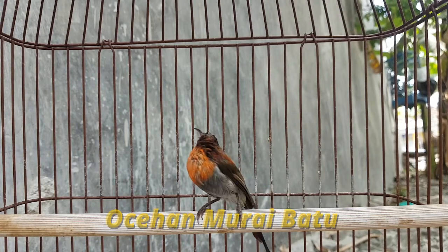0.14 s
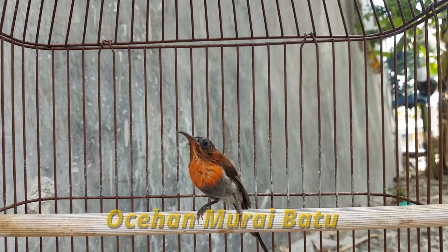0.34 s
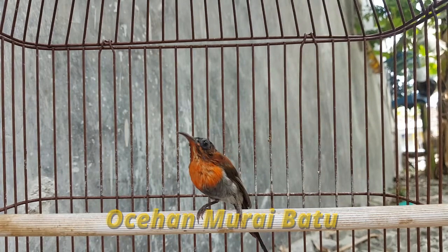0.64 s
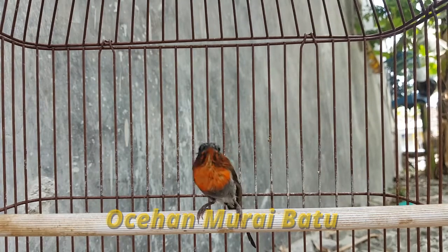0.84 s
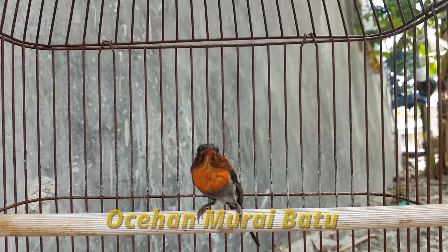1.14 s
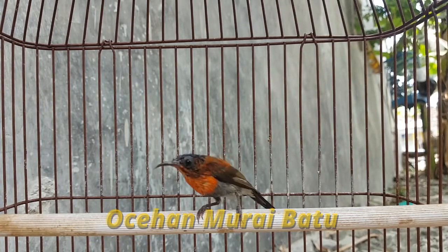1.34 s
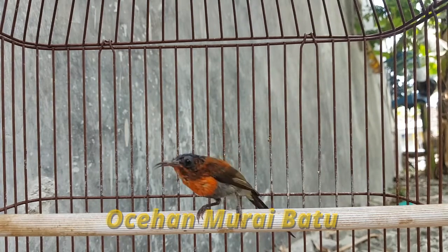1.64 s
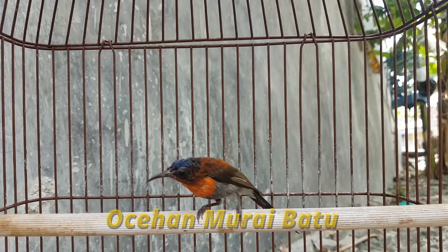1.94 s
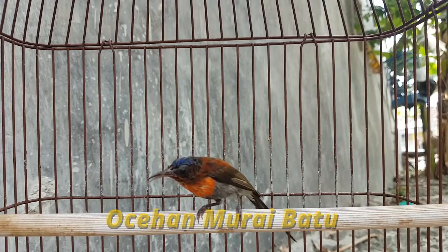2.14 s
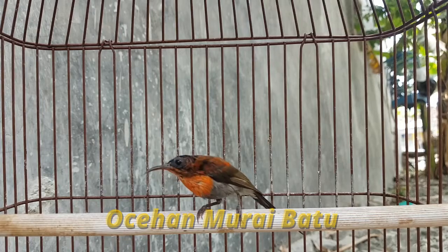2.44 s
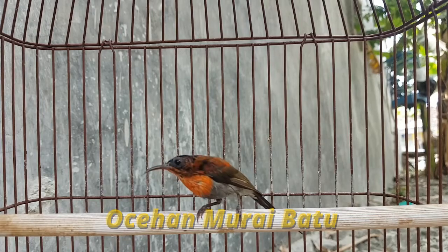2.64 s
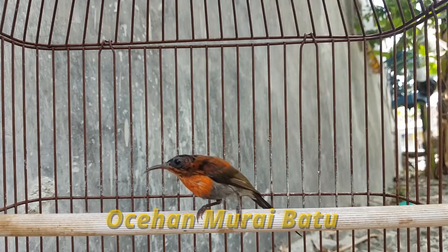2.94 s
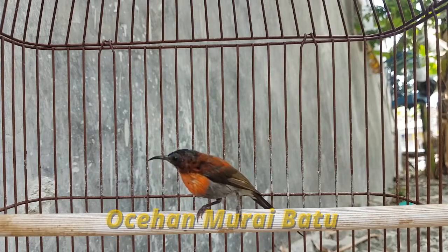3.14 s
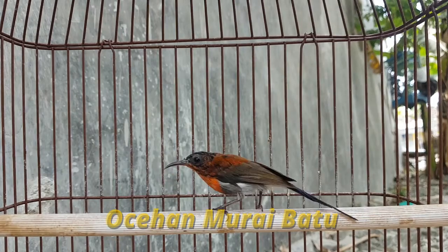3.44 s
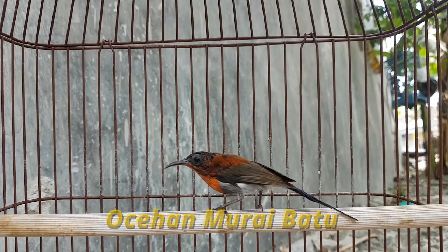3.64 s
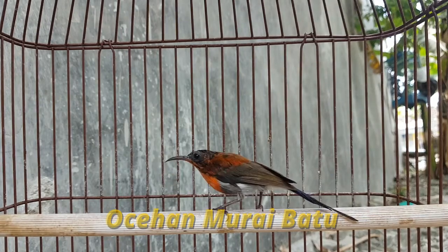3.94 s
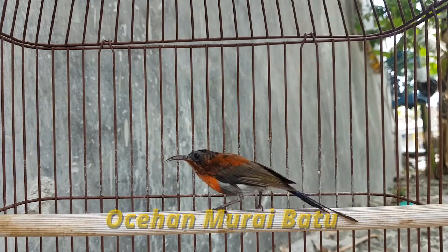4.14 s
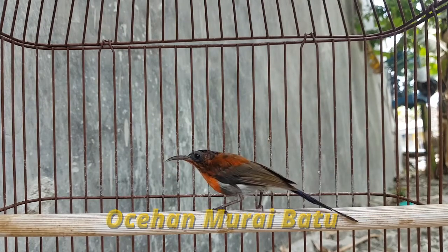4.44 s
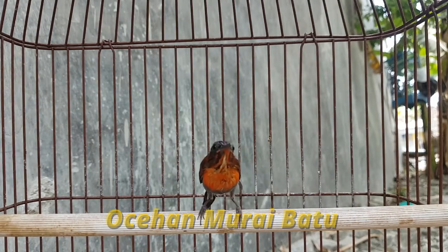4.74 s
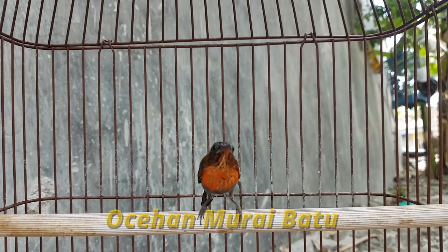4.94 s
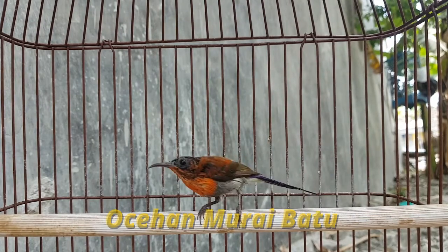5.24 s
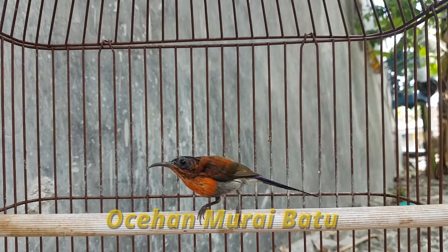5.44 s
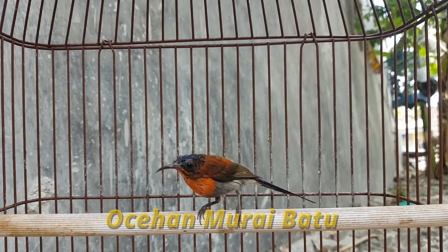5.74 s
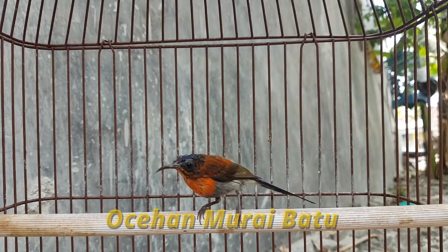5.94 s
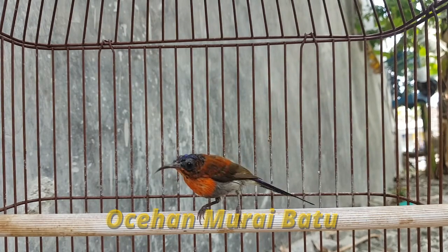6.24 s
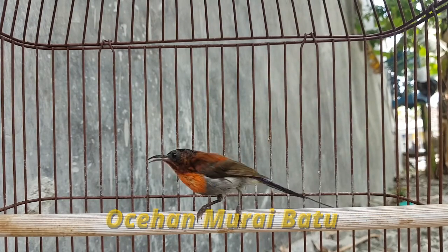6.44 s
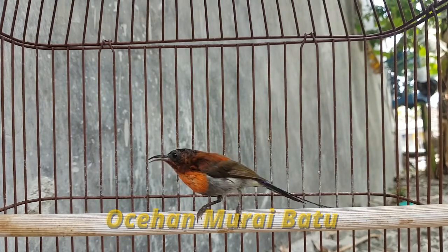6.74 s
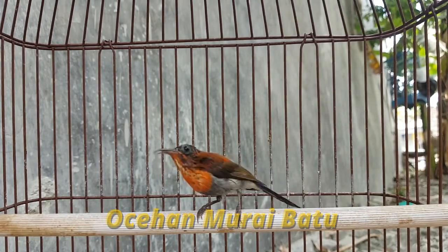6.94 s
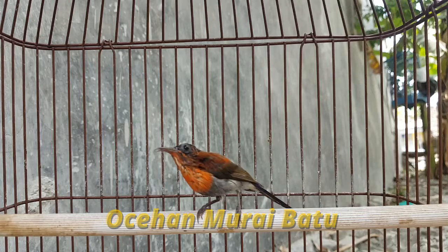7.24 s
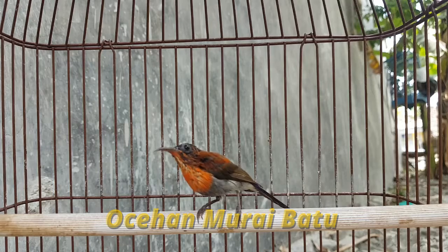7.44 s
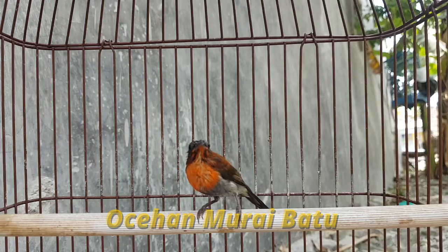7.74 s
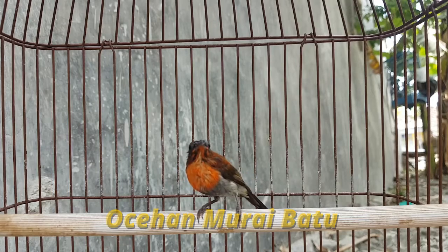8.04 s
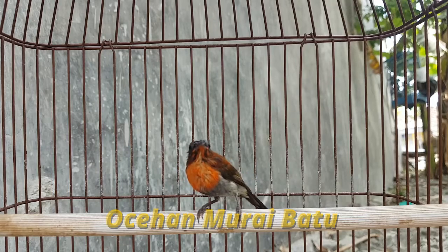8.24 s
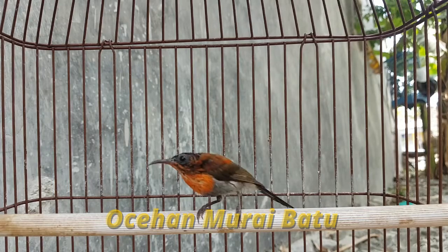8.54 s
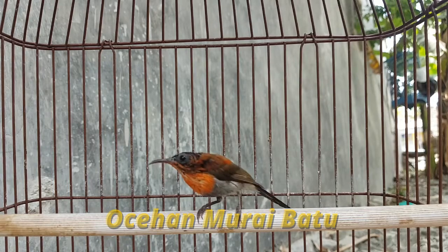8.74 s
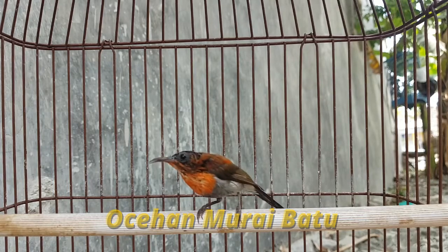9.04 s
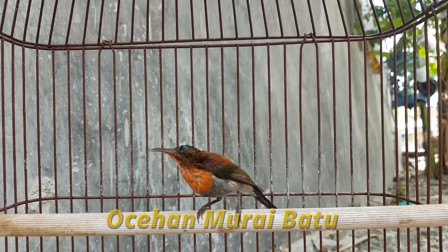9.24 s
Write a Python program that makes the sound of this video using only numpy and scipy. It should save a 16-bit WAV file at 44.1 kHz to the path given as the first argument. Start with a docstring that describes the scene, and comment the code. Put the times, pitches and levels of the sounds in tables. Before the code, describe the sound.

Close, piercing warbles, chips and short whistles from a small caged bird repeat between pauses, over far-off bird calls and soft street noise.

```python
"""A small caged bird sings close to a two-port microphone under a roof: warble, chip, long whistle,
over and over. The two halves of its syrinx modulate each other; its throat adds a rasp.
The walls echo the song, and the loudest notes are limited and clip. Other birds whistle, chip
and call hoarsely far away. Outside: traffic, a passing engine, a thin rustle and faint hums,
all dipping briefly a third of the way in."""
import sys
import numpy as np
from scipy import signal
from scipy.fft import rfft, irfft, next_fast_len
from scipy.io import wavfile
from scipy.ndimage import uniform_filter1d, minimum_filter1d, map_coordinates

SR = 44100
rng = np.random.default_rng(int(sys.argv[2]) if len(sys.argv) > 2 else 0)


def output_pcm(signal):
    """Save a mono or channel-first signal as 16-bit PCM at the path in sys.argv[1].

    Samples are clipped to [-1, 1] before scaling.
    """
    pcm = np.clip(np.atleast_2d(signal).T, -1, 1) * 32767
    wavfile.write(sys.argv[1], SR, np.round(pcm).astype(np.int16))


N = 413216
TIME_S = np.arange(N) / SR
PORT_LAG_S, TOP_HZ = 0.00014, 17560

# Each row: time in seconds, then rumble, street and engine levels in relative dB.
TRAFFIC_LEVELS = [(0, -80.5, -68, -96), (.75, -60.5, -62, -90), (1.3, -72.5, -66.5, -93),
                  (2.5, -71.5, -63, -89), (3.7, -71, -70.5, -86.5), (4.28, -58.5, -61, -59.5),
                  (5.1, -75.5, -72.5, -91.5), (5.8, -68.5, -66.5, -77.5), (6.35, -56, -59, -69),
                  (7.1, -76, -64.5, -95.5), (8, -72, -67, -88), (9.37, -71, -59, -84)]
# Each row: time in seconds, gain in dB.
OUTDOOR_FADE = [(0, 0), (2.6, -2), (3.05, -12), (3.28, -27), (3.312, -36), (3.32, -11), (3.6, 2.5), (4, -3),
                (9.4, -1.5)]
RUSTLE_GAIN = [(0, -67), (.1, -68), (.16, -90), (.64, -92), (.655, -56), (.75, -89), (1.3, -78), (1.5, -95)]
# Spectra. Each row: frequency in Hz, level in relative dB.
RUMBLE_SPECTRUM = [(12, -48.5), (20, -22), (38, -5.5), (75, -4.5), (112, -8), (189, -13.5), (700, -16.5),
                   (910, -51.5), (1540, -120)]
STREET_SPECTRUM = [(180, -43.5), (300, -20.5), (348, -3.5), (385, -10.5), (1030, 0), (1720, 1), (2480, -10),
                   (2740, -13.5), (5610, -35), (10900, -31), (16000, -41)]
RASP_SPECTRUM = [(900, -62.5), (1600, -33), (2600, -18), (4200, -10), (5800, -5), (7600, -15), (11000, -19),
                 (15500, -28.5), (16300, -62.5)]
OVERTONE_SPECTRUM = [(6000, -36), (8500, -36.5), (11000, -29), (13500, -37.5), (16000, -47.5),
                     (17000, -60.5)]
WALL_RESPONSE = [(2500, 10), (3500, 1.5), (4400, 3), (5400, 5), (7000, 0.5), (9000, 6), (14000, -8)]
INPUT_RESPONSE = [(9000, 0.5), (12000, -1.5), (16000, -11)]
# Outdoor noise. Each row: frequency in Hz, left-right correlation.
COHERENCE = [(60, 0.93), (180, 1), (550, -0.13), (1650, 0.19), (4970, 1), (15000, -0.01)]
# Each row: multiple of the firing rate, level in relative dB.
ENGINE_ORDERS = [(3, -7.5), (4, -9.5), (5, 2.5), (6, -3.5), (7, -16.5)]
# Each row: start in seconds, level in relative dB, nominal low and high pitch in Hz, high re low in dB.
FAR_CHIPS = [(0.1474, -70.5, 2150, 4340, 18.5), (0.6539, -28.5, 2385, 4000, -55),
             (1.2213, -44, 2761, 4260, -23), (2.6086, -53, 2940, 4080, -40), (3.024, -63, 2797, 5090, -34),
             (3.3702, -46, 2575, 5890, -4), (5.908, -51, 2940, 5150, -12), (6.7233, -34, 2768, 4582, 5),
             (7.57, -43, 2300, 4470, -25), (7.8344, -43.5, 2245, 5815, -15),
             (7.9981, -45.5, 2070, 4705, -4.5), (8.5799, -39, 3454, 4200, -19.5),
             (9.1549, -36, 2371, 5055, 4.5)]
# Glides. Each row: start and length in seconds, first, middle and last pitch in Hz,
# peak in relative dB, peak position 0-1, rise and fall in dB.
FAR_WHISTLES = [(.29, .62, 3624, 3650, 2676, -57, 0.76, 10.5, 7.5),
                (2.05, 0.44, 3660, 3780, 3754, -46.5, 0.28, -0.5, 31),
                (5.07, .67, 3835, 3620, 2899, -61, 0.32, 17.5, 12),
                (6.79, .18, 3760, 3780, 3836, -45.5, .5, -1.5, 8),
                (6.99, 0.2, 3809, 3780, 3720, -43.5, 0.01, -3, 34.5),
                (8.47, 0.1, 3330, 3350, 3370, -65.5, 0.9, 12.5, 3),
                (8.4, 0.3, 4964, 4050, 3990, -52.5, 0.62, 24, 22)]
FAR_HOARSE_CALLS = [(.46, .14, 2000, 2120, 2025, -37, .25, 13, 30),
                    (.6, 0.2, 2065, 2089, 2000, -49, .55, 24, 33),
                    (6.28, 0.23, 1305, 1305, 1278, -52.5, .45, 7, 5.9),
                    (7.4, .16, 3350, 3207, 3040, -50, .2, 5, 16)]
HUM_GLIDES = [(3.58, .2, 511.4, 534.5, 534, -71, .45, 17, 14),
              (7.68, 1.8, 1181, 1151, 1122, -68, 0.98, 7.9, 1)]
# The song. Each row: start and length in seconds, gain in dB, detune in percent, then in dB:
# 2nd harmonic offset, rasp offset, growth over the note, left-right balance from the head's turn.
SONG_WARBLES = [(1.596, .182, .5, .3, 3, 1.5, -2, -2), (4.09, .177, .5, -0.24, -1, -0.5, 1, -2.5),
                (6.392, .18, 0.5, 0.23, -.5, -0.5, 1.5, -1), (7.214, .186, -0.5, 0.26, -1.5, -5, -0.5, -1),
                (8.862, .182, 1, -.2, -1, 1, 1.5, -1.5)]
SONG_CHIPS = [(1.994, .05, 0, .2, -.5, -1.5, -0.5, -1.5), (4.499, .05, -2.5, -.5, -.5, 5, -4, .5),
              (6.745, .05, 0, 1.5, .5, -0.5, -3.5, -.5), (9.219, .05, -1, -.2, -.5, -0.5, 2, -0.82)]
SONG_LONGS = [(2.133, .146, -2, -.2, 0, .5, -1, -.5), (4.62, .146, 0.5, 0.14, -3.5, .5, 7, .5),
              (6.866, .146, .5, .2, -.5, .5, .5, -.5), (9.35, 0.18, 2, -.5, 1.5, -5, .5, 0.63)]
# Note templates. Each row: offset in seconds, pitch in Hz, harmonics 1 and 2 and rasp in relative dB.
WARBLE_SHAPE = [(0, 2237, -53.5, -52.5, -55.5), (.012, 2843, -36.5, -21.5, -20),
                (.028, 3466, -17.5, -19.5, -35), (.054, 3528, -9, -36, -40), (.068, 2823, -38.5, -27, -44),
                (.08, 2731, -39, -22, -31), (.086, 2844, -34, -20.5, -34), (.093, 3117, -28, -14, -31),
                (.105, 4182, -17.5, -29, -34), (.128, 4371, -8, -42.5, -47), (.15, 4510, -6, -40.5, -43.5),
                (0.172, 4410, -5.5, -32.5, -50), (.181, 4433, -38.5, -52, -56)]
CHIP_SHAPE = [(0, 2047, -54, -49, -54.5), (.014, 2324, -35, -16, -25.5), (.022, 2625, -26.5, -15, -24.5),
              (0.027, 2726, -30.5, -14, -23.5), (.034, 2520, -25, -8, -21), (.042, 2126, -41.5, -21, -32),
              (.05, 1893, -42.5, -43, -41)]
LONG_SHAPE = [(0, 2535, -49.5, -46, -36), (.012, 2510, -36, -19.5, -20.5), (0.02, 2516, -34.5, -10, -31),
              (.036, 2529, -26.5, -5.5, -26.5), (.055, 2652, -32, -5, -36.5), (0.078, 2717, -33.5, -5, -40),
              (0.095, 2680, -31, -6.5, -40), (.111, 2655, -33, -16.5, -35.5),
              (.132, 3026, -21.5, -37.5, -45), (.146, 3050, -35, -73.5, -54)]
# A lone, faint chip tail. Same columns, in scene time.
CHIP_TAIL = [(3.316, 2553, -59.5, -45.5, -54), (3.325, 2313, -69, -45, -54), (3.332, 2035, -68, -60, -58)]
# Second syrinx half. Same columns, without rasp.
CHIP_SECOND_HALF = [(0, 2980, -56.5, -54.5), (.013, 3228, -26, -22), (0.024, 3463, -25, -17.5),
                    (.035, 3280, -24, -25.5), (.05, 2973, -46.5, -44)]
LONG_SECOND_HALF = [(.006, 3739, -45, -57), (0.026, 3777, -26.5, -47), (.06, 3860, -51, -65),
                    (.111, 4000, -34.5, -56), (.121, 3937, -39, -64)]
# Split tone. Each row: offset in seconds, pitch in Hz, level in relative dB.
SPLIT_SHAPE = [(.05, 5200, -36.5), (0.068, 5276, -14.5), (.08, 5131, -19), (.096, 5080, -26.5),
               (0.107, 4695, -25)]
# Its gain in dB, one per long note.
SPLIT_GAIN_DB = [6.5, -2.5, -2, 2]
# Nearby surfaces colour the ports differently. Each row: frequency in Hz, left minus right in dB.
PORT_BALANCE = [(2530, 6.5), (2700, 1.5), (3000, 11), (3400, 1.5), (3580, 8), (4200, 12.5), (4360, 21.5),
                (4520, 4), (5000, 2), (5400, 6), (6500, -1.5), (7000, 8), (10000, 4.5)]
# Each row: frequency in Hz, base T60 in seconds, scaled per echo.
BASE_T60 = [(1500, .6), (4500, .55), (9000, .55), (15000, .45)]


def amp(db):
    return 10 ** (np.asarray(db) / 20)


def unit_rms(x):
    return x / np.sqrt(np.mean(x ** 2) + 1e-20)


def log_interp(points, hz):
    knots_hz, values = np.transpose(points)
    return np.interp(np.log(hz + 1), np.log(knots_hz + 1), values)


def wobble(rate_hz):
    """Smooth random curve."""
    return map_coordinates(rng.standard_normal(int(N * rate_hz / SR) + 4), [TIME_S * rate_hz])


def filtered(x, response):
    size = next_fast_len(N + SR // 2)
    return irfft(rfft(x, size) * response(np.fft.rfftfreq(size, 1 / SR)), size)[..., :N]


def tracks(tables, edge_s=0.0039):
    """A gate open during each table, and a per-sample curve for each column."""
    gate = np.zeros(N)
    for rows in tables:
        inside_s = np.minimum(TIME_S - rows[0][0], rows[-1][0] - TIME_S)
        gate = np.maximum(gate, np.clip(inside_s / edge_s + 1, 0, 1))
    knots_s, *columns = np.transpose(sorted(tuple(row) for rows in tables for row in rows))
    return gate, [np.interp(TIME_S, knots_s, column) for column in columns]


def phase_of(hz):
    return 2 * np.pi * np.cumsum(hz) / SR


def sine(phase, rms_db):
    return np.sqrt(2) * amp(rms_db) * np.sin(phase)


def panned(x, left_right_db):
    return x * np.sqrt(2 / (1 + amp([-2 * left_right_db, 2 * left_right_db]).reshape(2, -1)))


def echoes(x, t60_scale):
    """Stereo reverb; each frequency dies at its own rate."""
    hz, t, bins = signal.stft(rng.standard_normal((2, SR)), SR, nperseg=256)
    t60_s = t60_scale * log_interp(BASE_T60, hz)[:, None]
    tail = signal.istft(bins * amp(-60 * t / t60_s), SR, nperseg=256)[1]
    return signal.fftconvolve(x[None], tail / np.linalg.norm(tail[0]), axes=1)[:, :N]


def rush(spectrum, patchy_db):
    """Unit-rms stereo noise with patches of random gain."""
    def mid_side(hz):
        angle = np.arccos(np.clip(log_interp(COHERENCE, hz), -1, 1)) / 2
        return amp(log_interp(spectrum, hz)) * [np.cos(angle), np.sin(angle)]
    bins = signal.stft(rng.standard_normal((2, N)), nperseg=512)[2]
    patches = uniform_filter1d(uniform_filter1d(rng.standard_normal(bins.shape[1:]), 6, 0), 14, 1)
    noise = signal.istft(bins * amp(patchy_db * unit_rms(patches)), nperseg=512)[1][:, :N]
    mid, side = filtered(noise, mid_side)
    return unit_rms(np.array([mid + side, mid - side]))


def glides(calls, jitter, rate_hz, end_jitter=0, edge_s=0.027):
    """Bent tones whose pitch and level scatter on a long path."""
    out = np.zeros(N)
    for start_s, length_s, from_hz, mid_hz, to_hz, db, peak_at, rise_db, fall_db in calls:
        age_s = TIME_S - start_s
        u = np.clip(age_s / length_s, 0, 1)
        hz = from_hz + (to_hz - from_hz) * u + 2 * (2 * mid_hz - from_hz - to_hz) * u * (1 - u)
        hz *= 1 + (jitter + end_jitter * u * u) * wobble(rate_hz)
        level_db = db - np.interp(u, [0, peak_at, 1], [rise_db, 0, fall_db])
        gate = np.clip(np.minimum(age_s, length_s - age_s) / edge_s + 1, 0, 1)
        out += gate * sine(phase_of(hz), level_db + 3 * wobble(55))
    return out


def sung(notes, shape, base_s, gains_db=None):
    """One table per note: the template stretched, detuned and levelled."""
    tables = []
    for k, (start_s, length_s, db, detune_pct, second_db, rasp_db, growth_db, _) in enumerate(notes):
        rows = np.array(shape, float)
        rows[:, 2:] += growth_db * (rows[:, :1] / base_s - .5)
        rows[:, 0] = start_s + rows[:, 0] * length_s / base_s
        rows[:, 1] *= 1 + detune_pct / 100
        rows[:, 2:] += db + (0 if gains_db is None else gains_db[k])
        rows[:, 3:4] += second_db
        rows[:, 4:] += rasp_db
        tables.append(rows)
    return tables


def traffic(firing_hz=22.4):
    """Rumble, street hiss and the firing harmonics of a passing engine."""
    rumble_db, street_db, engine_db = tracks([TRAFFIC_LEVELS])[1]
    rumble = amp(rumble_db + 1.1 * wobble(3.7)) * rush(RUMBLE_SPECTRUM, patchy_db=2)
    street = amp(street_db + 1.5 + 1.1 * wobble(5)) * rush(STREET_SPECTRUM, patchy_db=1.7)
    firing = phase_of(firing_hz * (1 + 0.0038 * wobble(22)))
    engine = sum(sine(k * firing, db + engine_db + 7 + 2.5 * wobble(13)) for k, db in ENGINE_ORDERS)
    return rumble + street + engine


def rustle():
    """Thin, patchy treble noise."""
    gate, (db,) = tracks([RUSTLE_GAIN])
    spectrum_hz_db = [(6000, -44), (8500, 25.5), (11500, 37), (15500, -28), (17000, -48.5)]
    return gate * amp(db) * rush(spectrum_hz_db, patchy_db=6)


def far_chips():
    """Rough, falling two-tone chips, heard mostly as echo."""
    chips, t = np.zeros(N), np.arange(SR // 25) / SR
    phase_per_hz = 2 * np.pi * np.cumsum(1.12 - 6 * t) / SR
    envelope = amp(-60 * t / 0.28) * np.minimum(t / .003, 1) * np.hanning(2 * len(t))[len(t):]
    for start_s, db, low_hz, high_hz, high_db in FAR_CHIPS:
        rough = 1 + 11 * uniform_filter1d(uniform_filter1d(rng.standard_normal(len(t)), 30), 30)
        tones = np.sin(low_hz * phase_per_hz) + amp(high_db) * np.sin(high_hz * phase_per_hz)
        chips[round(start_s * SR):][:len(t)] += amp(db - 13.5) * envelope * rough * tones
    return amp(-7) * chips + amp(-2.5) * echoes(chips, t60_scale=1)


def far_calls():
    """Whistles and hoarse calls, heard mostly as echo."""
    whistles = glides(FAR_WHISTLES, jitter=.011, rate_hz=250, end_jitter=.028)
    calls = whistles + glides(FAR_HOARSE_CALLS, jitter=.11, rate_hz=500)
    return amp(-12) * calls + amp(1.3) * echoes(calls, t60_scale=.55)


def syrinx_phase(hz, jitter):
    """The syrinx rounds off quick bends and wavers in pitch."""
    return phase_of(uniform_filter1d(hz, size=180) * (1 + jitter * wobble(300)))


def first_half(phase, hz, h1_db, h2_db, swell_db=2.5):
    """Main syrinx tone: two harmonics and faint, smeared overtones, swelling and sinking."""
    voice = sine(phase, h1_db) + sine(2 * phase, h2_db)
    hz = uniform_filter1d(hz, size=180)
    for k in range(3, 7):
        db = np.maximum(h1_db, h2_db) + log_interp(OVERTONE_SPECTRUM, k * hz) - 3 * (k - 3)
        voice += sine(k * phase, db) * (1.8 + 2.6 * wobble(800)) * (k * hz < TOP_HZ)
    return voice * amp(0.24 * wobble(200) + swell_db * wobble(70))


def throat_rasp():
    """Uneven breath noise through the throat."""
    breath = filtered(rng.standard_normal(N), lambda hz: amp(log_interp(RASP_SPECTRUM, hz)))
    return unit_rms(breath * amp(2.2 * wobble(400)))


def second_half(first_phase, first_h2_db, chip_s, long_s):
    """Second syrinx tone; the halves modulate each other into sum and difference tones."""
    notes = sung(SONG_CHIPS, CHIP_SECOND_HALF, chip_s) + sung(SONG_LONGS, LONG_SECOND_HALF, long_s)
    gate, (hz, h1_db, h2_db) = tracks(notes)
    phase = syrinx_phase(hz, jitter=0.009)
    voice = sine(phase, h1_db) + sine(2 * phase, h2_db)
    mean_db = (first_h2_db + h2_db) / 2
    for j, k, db in [(1, 1, -7), (2, 1, -18), (1, 2, -20), (2, -1, -31.5), (3, -1, -19.5)]:
        voice += sine(j * first_phase + k * phase, mean_db + db)
    return gate * voice


def split_tone(long_s):
    """Splits off below the long note's 2nd harmonic and beats with it."""
    gate, (hz, db) = tracks(sung(SONG_LONGS, SPLIT_SHAPE, long_s, SPLIT_GAIN_DB))
    return gate * sine(phase_of(hz), db)


def caged_bird():
    """Both syrinx halves; an unsteady voice rasps and flutters. The head turns note by note."""
    warble_s, chip_s, long_s = WARBLE_SHAPE[-1][0], CHIP_SHAPE[-1][0], LONG_SHAPE[-1][0]
    song = sung(SONG_WARBLES, WARBLE_SHAPE, warble_s) + sung(SONG_CHIPS, CHIP_SHAPE, chip_s)
    song += sung(SONG_LONGS, LONG_SHAPE, long_s) + [CHIP_TAIL]
    gate, (hz, h1_db, h2_db, rasp_db) = tracks(song)
    phase = syrinx_phase(hz, jitter=0.0079)
    first = gate * first_half(phase, hz, h1_db, h2_db)
    flutter = 1 + np.minimum(1.2 * amp(rasp_db - np.maximum(h1_db, h2_db)), .3) * wobble(1200)
    second = second_half(phase, h2_db, chip_s, long_s)
    rasp = gate * amp(rasp_db) * throat_rasp()
    notes = np.array(sorted(SONG_WARBLES + SONG_CHIPS + SONG_LONGS))
    current = np.maximum(np.searchsorted(notes[:, 0], TIME_S + .01) - 1, 0)
    facing_db = notes[current, -1]
    return panned(flutter * (first + second) + rasp + split_tone(long_s), facing_db)


def wall_echoes(bird):
    """Early reflections, then a late tail; the yard smears each pitch a little."""
    walls = filtered(bird.mean(0), lambda hz: amp(log_interp(WALL_RESPONSE, hz)))
    early = amp(-21) * echoes(walls, t60_scale=.17)
    scattered = walls * (.75 + .5 * wobble(550) + .15 * wobble(3500))
    return early + amp(-24) * echoes(scattered, t60_scale=.58)


def hums():
    """Faint wavering tones, heard only as echo."""
    return amp(10.5) * echoes(glides(HUM_GLIDES, jitter=.06, rate_hz=250), t60_scale=.58)


def port_response(hz):
    """Each port has its own colour; the right one hears the bird later."""
    lag = np.exp(-2j * np.pi * hz * PORT_LAG_S * np.array([[-.5], [.5]]))
    return panned(lag, log_interp(PORT_BALANCE, hz))


def scene():
    bird = caged_bird()
    birds = filtered(bird, port_response) + wall_echoes(bird) + far_chips() + far_calls()
    outdoors = panned(traffic() + rustle(), left_right_db=1.8) + hums()
    _, (fade_db,) = tracks([OUTDOOR_FADE])
    return birds + amp(fade_db) * outdoors


def record(dry, limit=1.1):
    """A fast limiter holds the loudest notes, their tips clip; the input dulls and cuts the treble."""
    gain = minimum_filter1d(limit / np.maximum(np.abs(dry), limit), size=120)
    clipped = np.clip(dry * uniform_filter1d(gain, size=100), -1, 1)
    return filtered(clipped, lambda hz: amp(log_interp(INPUT_RESPONSE, hz)) * (hz < TOP_HZ))


dry = scene()
out = record(dry)
output_pcm(out)
```